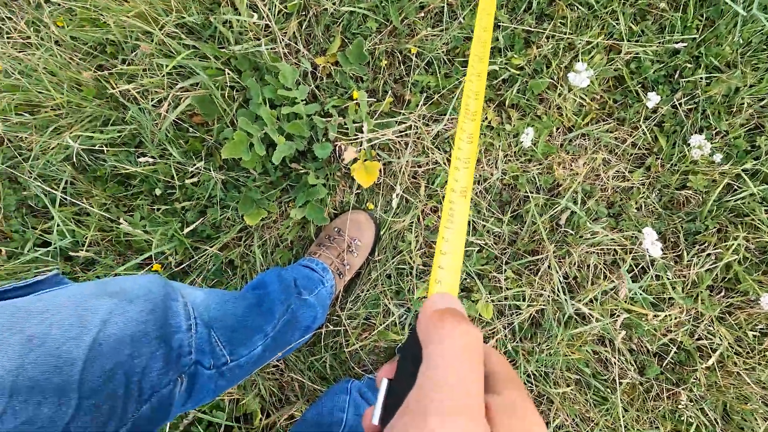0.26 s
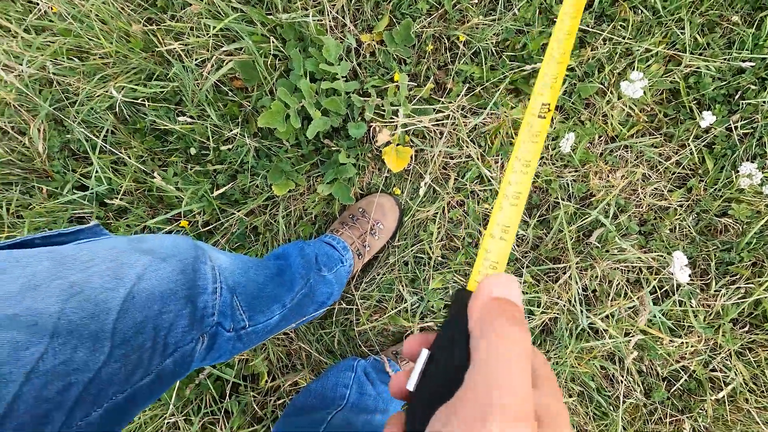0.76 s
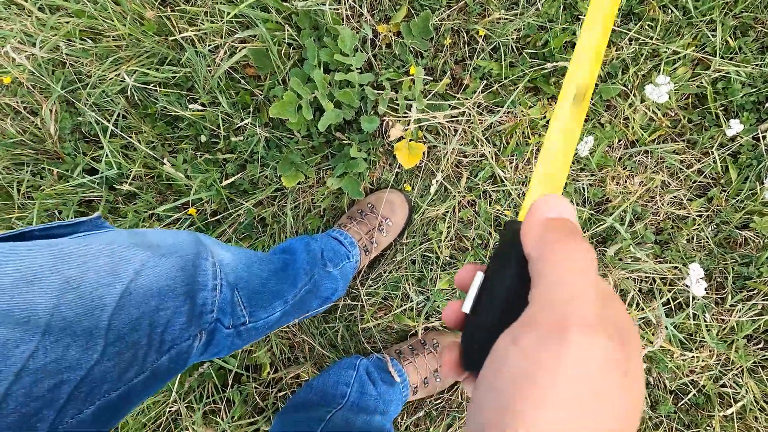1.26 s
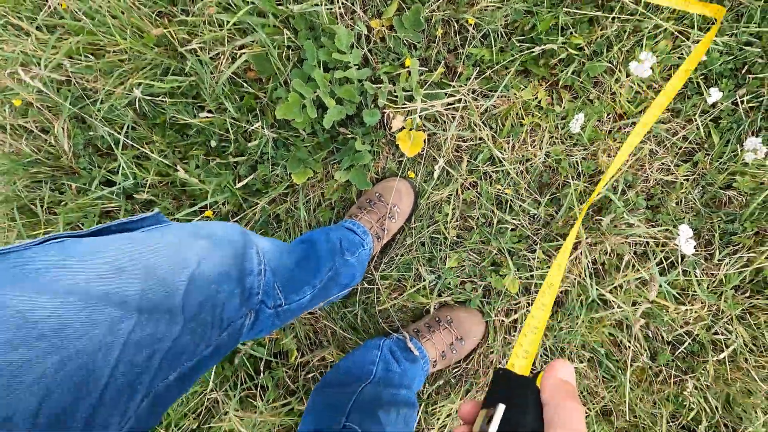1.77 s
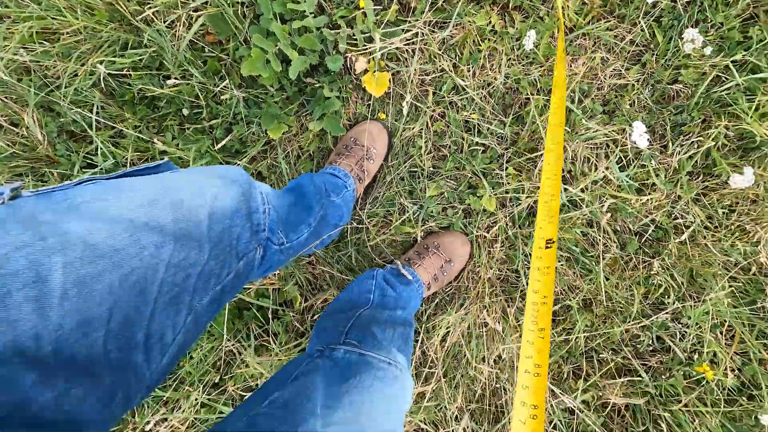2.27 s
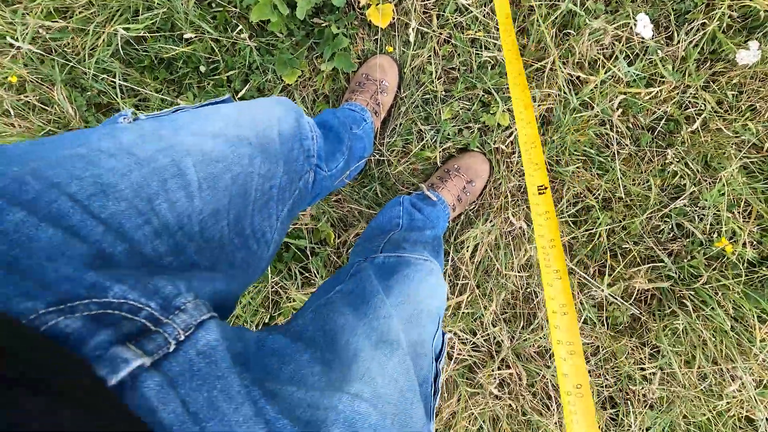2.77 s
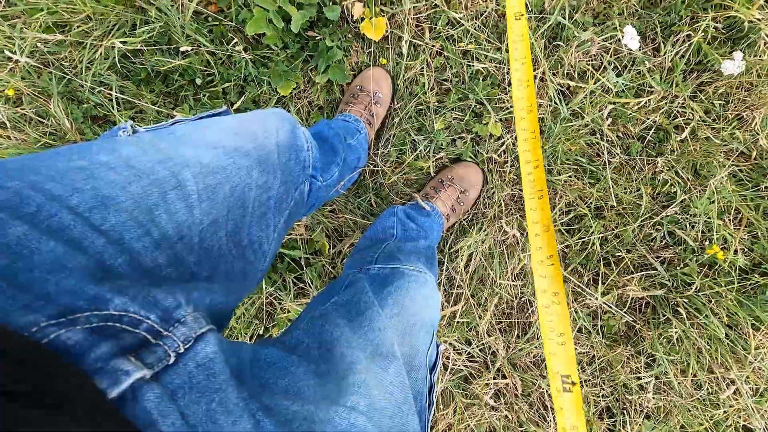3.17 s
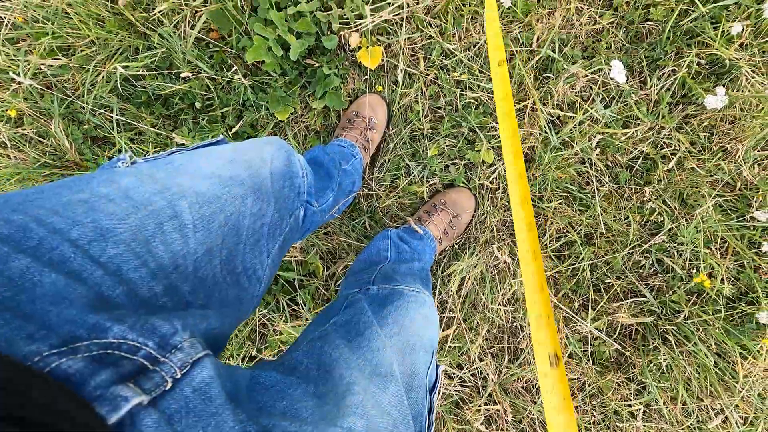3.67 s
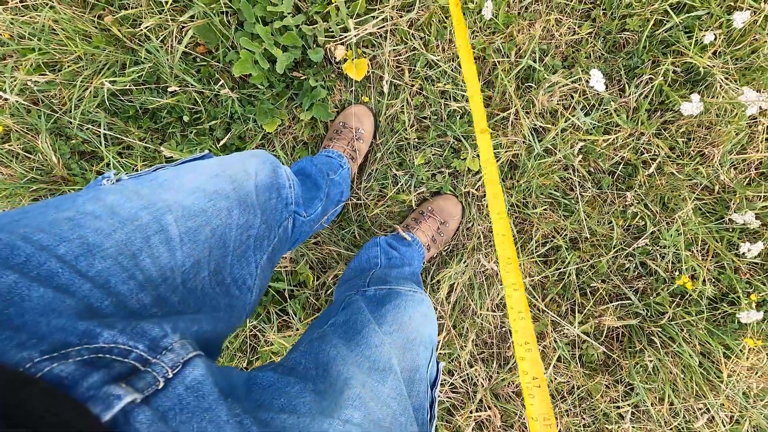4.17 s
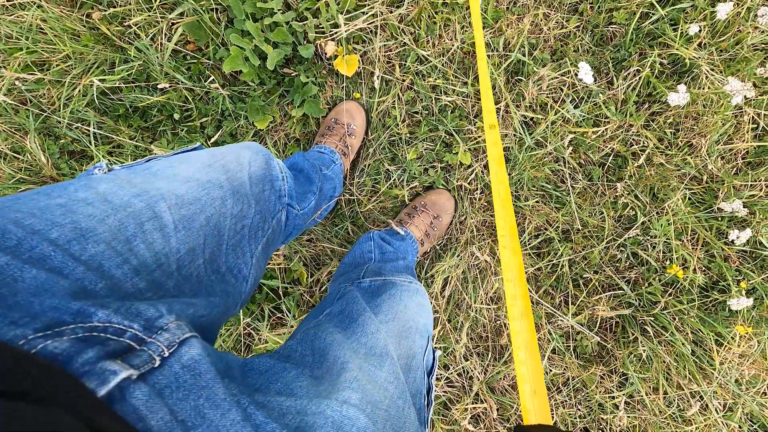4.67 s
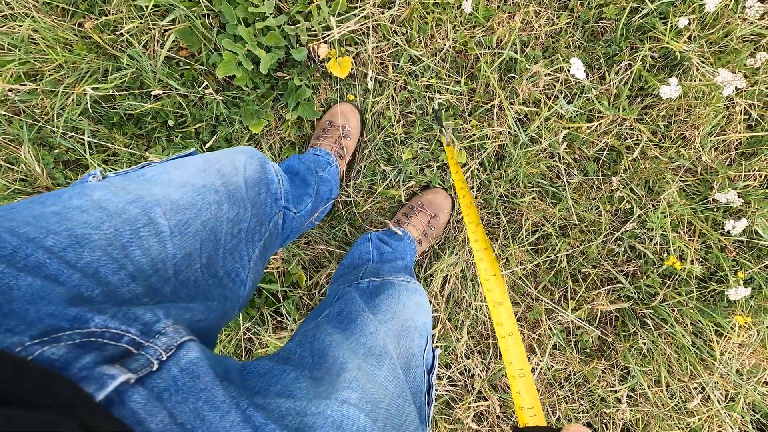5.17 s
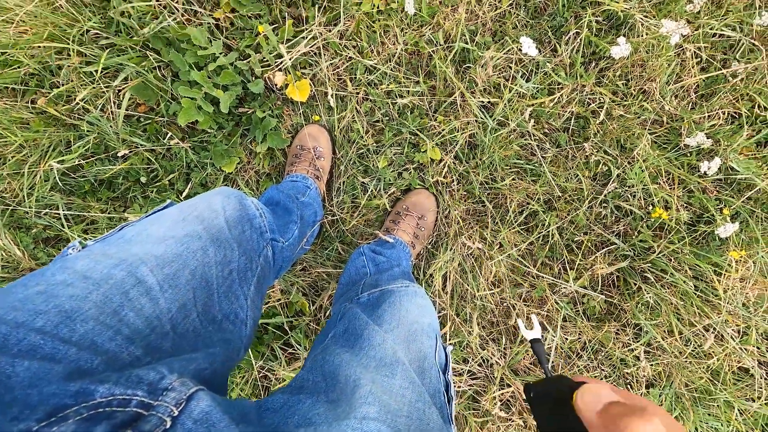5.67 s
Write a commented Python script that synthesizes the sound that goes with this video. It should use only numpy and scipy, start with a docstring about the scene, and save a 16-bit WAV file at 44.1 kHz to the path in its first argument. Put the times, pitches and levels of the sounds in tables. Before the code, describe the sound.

A handheld tape measure retracts in a grassy field, heard close by, nearly mono, with no echo. Its spool whirs roughly in early spurts with dense plastic ticks and hollow bumps, then nearly rests. The thin blade whips, hisses and knocks in uneven pulls, before the metal hook smacks into the case and leaves faint air.

```python
"""Faint open air comes first, then clicks and bumps as a steel tape measure is reeled in by spurts.
The blade scrapes and hisses as filtered noise built from tiny impacts; the reel rumbles and rattles.
Decaying modes make the case click and the spool bump; the bending blade knocks and its steel sizzles.
Near the end the hook slams into the case, which jumps with a short thud. No echo is added."""
import sys
import numpy as np
from scipy import signal
from scipy.fft import rfft, irfft, next_fast_len
from scipy.io import wavfile
from scipy.ndimage import uniform_filter1d, map_coordinates

SR = 44100
rng = np.random.default_rng(int(sys.argv[2]) if len(sys.argv) > 2 else 0)


def file_out(sig):
    """Save sig as 16-bit WAV at sys.argv[1]."""
    # one column per channel
    cols = np.atleast_2d(sig).T
    # limit, then scale
    lim = np.clip(cols, -1, 1)
    pcm = np.round(lim * 32767).astype(np.int16)
    wavfile.write(sys.argv[1], SR, pcm)


N = 261299

# In spectra, levels are relative: each sound is set to its loudness later.
# the open air: (time [s], level [dB])
AIR_LEVEL = [(0, -46.5), (.3, -46.5), (1, -49), (2.05, -55.5), (2.7, -53.5), (5.7, -51.5), (5.93, -56.5)]
# soft rubbing of hand and clothes: (time [s], level [dB])
CLOTH_LEVEL = [(0, -71), (2.1, -78), (2.25, -55.5), (2.5, -50), (2.7, -59), (3.2, -50), (5.6, -54.5),
               (5.93, -58)]
# spectra of the air and the cloth: (frequency [Hz], level [dB])
AIR_SPECTRUM = [(25, 6), (100, -10), (150, -0.5), (190, 2.5), (320, -5), (650, -6.5), (900, -10.5),
                (1400, -3.5), (2200, -13.5), (3500, -18), (5500, -25.5), (8000, -47), (14000, -41)]
CLOTH_SPECTRUM = [(40, -33.5), (130, -16), (220, -5.5), (400, -4), (700, -21), (2000, -23), (6000, -52)]
# the spool bumps hard inside the case: (time [s], level before a common lift [dB], pitch [Hz])
SPOOL_CLUNKS = [(0.358, -34.5, 680), (0.668, -13, 910), (0.741, -11, 1050), (1.249, -13, 657),
                (1.45, -18.5, 890), (3.847, -19.5, 606), (3.892, -18, 610), (4.874, -23, 584)]
# brake, blade and hook tap the case:
# (time [s], level before a common lift [dB], brightest ring [Hz], boost of low case modes [dB])
CASE_TAPS = [(0.3008, -20, 2530, -14), (0.3032, -11.5, 4550, -6), (0.3369, -20.5, 2420, -10),
             (0.5118, -22.5, 2860, -12), (0.611, -13.5, 2780, 3), (0.6228, -10, 2640, 2.5),
             (0.631, -3.5, 2450, -5), (0.6497, -9, 3000, -5), (0.6823, -8.5, 2650, -3),
             (0.7423, -7, 2090, 2.5), (0.951, -34, 4740, -18), (0.9958, -16.5, 3800, -7),
             (1.0005, -16.5, 2410, -1), (1.053, -15, 4180, -11), (1.069, -12.5, 4150, -4),
             (1.1086, -11.5, 2500, -7), (1.1155, -8, 2507, -3.5), (1.1268, -10.5, 3830, -7),
             (1.1913, -8, 2640, 3.5), (1.226, -10, 2270, -1), (1.2486, -8.5, 2910, 1),
             (1.5286, -7, 4140, -2), (1.5533, -9, 3500, 3), (2.428, -26.5, 2022, -14),
             (2.7928, -31.5, 2440, -10), (2.8595, -16, 2520, -13.5), (3.223, -22.5, 2170, -12),
             (3.2792, -15.5, 3800, -8.5), (3.4417, -13.5, 3100, -0.5), (3.4945, -8, 4000, -12),
             (4.0245, -10, 3400, -13), (4.6095, -16, 2180, 0), (4.6732, -18, 2480, -18),
             (4.8166, -10, 2410, -25), (4.8903, -8, 2530, -5), (5.2759, -10.5, 2650, 2),
             (5.387, -16, 2680, -2), (5.4503, -15.5, 3270, -15), (5.6788, -25.5, 3100, -2),
             (5.8608, -32, 2110, -15), (5.89, -34, 2650, -16)]
# random ticks and bumps of the turning spool:
# (rate [per s], level over the scrape before that lift [dB], scatter [dB], pitch [Hz], scatter [octaves])
STRAY_TICKS = (60, 7.5, 2, 2700, 0.4)
STRAY_BUMPS = (34, 1.4, 2.4, 717, 0.22)
# modes of the case with the blade in it: (frequency [Hz], relative level [dB], time to fall 60 dB [s])
CASE_MODES = [(607, -5, 0.021), (884, -4.5, 0.0089), (1660, -1, 0.0027), (2230, -1.5, 0.013),
              (2487, 0.5, 0.0095), (2920, -3, 0.012), (3596, -2.5, 0.011), (4320, -1.5, 0.01),
              (5360, 0, 0.0048), (6780, -1, 0.0069), (6790, -7, 0.0064), (11240, -9, .003)]
# the blade buckles and snaps straight:
# (time [s], level before a common lift [dB], boost of the low thud [dB])
BLADE_KNOCKS = [(2.961, -11.5, 3), (2.972, -11.5, 4.5), (2.986, -15, 13), (3.594, -11.5, -1.5),
                (3.603, -17.5, 9), (3.873, -6, 7.5), (4.19, -8.5, 8.5), (4.441, -18, 2.5),
                (4.997, -9.5, 3.5), (5.276, -16, 7)]
# spectrum of a knock: (frequency [Hz], level [dB])
KNOCK_SPECTRUM = [(40, -20), (110, -16.5), (190, -1), (330, 4.5), (650, 1), (1200, -4.5), (2300, 7.5),
                  (3300, 4.5), (4500, -6.5), (8000, -14), (14000, -31)]
# the hook strikes home and rebounds: (time [s], level [dB], brightness [0-1])
HOOK_BLOWS = [(5.6152, 15.5, 1), (5.6163, 5, 0.4), (5.6174, 3, 0.07)]
# the case jumps in the hand: (frequency [Hz], level before a low cut [dB], time to fall 60 dB [s])
CASE_JOLT = [(136, -23.5, 0.036), (417, -28.5, 0.043), (720, -10, 0.024), (880, -7, 0.012)]
# the loose blade whips and sizzles: (time [s], level before flutter [dB], time to fall 60 dB [s])
BLADE_WHIPS = [(0.303, -38.5, 0.18), (1.248, -26, 0.082), (2.740, -38.5, 0.19), (2.861, -40, 0.13),
               (2.959, -18, 0.33), (2.990, -11.5, 0.13), (3.512, -19, 0.32), (3.591, -22, 0.23),
               (3.641, -13.5, 0.23), (3.893, -14.5, 0.31), (3.929, -16.5, 0.18), (4.15, -16, 0.089),
               (4.192, -14.5, 0.26), (4.21, -12, 0.26), (4.826, -17.5, 0.18), (4.9392, -9.5, 0.06),
               (5.045, -15, 0.072), (5.275, -19.5, 0.088)]
# spectra of the whipping steel, scrape, hiss, reel rumble and coil rattle: (frequency [Hz], level [dB])
STEEL_SPECTRUM = [(50, -44), (400, -10), (1200, -21), (2300, -6), (3600, -3.5), (4800, 1), (6000, 0.5),
                  (7200, -3), (8200, -12.5), (9500, -15), (11200, -10), (12600, -18.5), (13600, -32.5),
                  (14400, -55)]
SCRAPE_SPECTRUM = [(300, -31), (900, -20), (1300, -12.5), (1700, -4.5), (2250, 1), (3000, 0.5),
                   (4000, -1.5), (5500, -18), (7500, -53), (11000, -40), (14000, -48)]
HISS_SPECTRUM = [(1000, -26.5), (2500, -17), (3600, -3), (4600, 4.5), (5800, -1), (7200, -3.5), (8000, -12),
                 (9500, -17), (11200, -14.5), (12600, -20), (13400, -33.5), (14300, -73)]
REEL_SPECTRUM = [(25, -20.5), (90, -21.5), (180, -6.5), (330, -5), (450, -7), (600, 3), (780, -5.5),
                 (1100, -10.5), (1600, -4.5), (3000, -61.5)]
RATTLE_SPECTRUM = [(60, -29), (200, -22.5), (420, -7), (640, -2), (950, -4), (1300, -6), (1750, -2),
                   (2300, 1.5), (3000, -1), (3600, -12), (5500, 1.5), (8000, -31.5), (14000, -55)]
# the spool spins up, runs and is braked; rise and fall are the times for 20 dB:
# (full speed at [s], held [s], scrape [dB], rise [s], fall [s], hiss over scrape [dB])
SPOOL_RUNS = [(0.625, 0.13, -26, 0.069, 0.17, -6), (1.125, 0.053, -27.5, 0.04, 0.16, -6),
              (1.253, 0.295, -23, 0.008, 0.044, -1.5), (5.6, 0.0093, -28, 0.064, 0.03, -6)]
# the free blade swishes as it is drawn along; rise and fall as above:
# (peak at [s], scrape [dB], rise [s], fall [s], hiss over scrape [dB], case rumble over scrape [dB])
BLADE_SWISHES = [(0.085, -64, 0.1, 0.2, 3, -4), (0.57, -32, 0.07, 0.2, -3, -16),
                 (0.715, -22, 0.11, 0.13, -3, -13), (0.83, -46.5, 0.1, 0.16, -14, -1),
                 (1.075, -33.5, 0.086, 0.2, 0, -11), (1.38, -31, 0.14, 0.18, 16, -7.5),
                 (1.531, -30, 0.51, 0.15, 13.5, -1.5), (1.695, -26, 0.083, 0.17, -1, -18),
                 (1.84, -44.5, 0.06, 0.091, 13, -14.5), (1.935, -34.5, 0.07, 0.15, 1, -11.5),
                 (2.23, -46, 0.14, 0.16, 6.5, -9.5), (2.38, -40, 0.1, 0.24, 1.5, -11.5),
                 (2.66, -52, 0.12, 0.1, 7, -10), (2.931, -29, 0.093, 0.28, 1, -9),
                 (3.019, -24, 0.12, 0.094, 2, -14.5), (3.13, -41.5, 0.029, 0.067, 4, -4.5),
                 (3.29, -30.5, 0.075, 0.11, 2, -10), (3.475, -36.5, 0.1, 0.41, 6, -8),
                 (3.61, -24, 0.091, 0.31, -1, -11), (3.78, -30.5, 0.6, 0.2, 3.5, -25),
                 (3.86, -25.5, 0.058, 0.18, 2.5, -10), (3.98, -24.5, 0.23, 0.27, -4.5, -21.5),
                 (4.159, -25, 0.12, 0.11, 1, -11), (4.3, -28, 0.32, 0.068, 0, -14.5),
                 (4.37, -45, 0.14, 0.16, -22, -4.5), (4.46, -22, 0.023, 0.1, 0.5, -11.5),
                 (4.68, -39, 0.11, 0.13, -11, -7), (4.778, -27.5, 0.16, 0.28, -0.5, -13),
                 (5.019, -31, 0.088, 0.12, 2, -8), (5.11, -28, 0.2, 0.15, -10.5, -10),
                 (5.26, -36, 0.14, 0.12, -7, -8.5), (5.505, -35, 0.073, 0.12, -1.5, -11),
                 (5.655, -44, 0.08, 0.034, -13, -7)]
# overall colour, a narrow notch near 9 kHz and little above 14 kHz: (frequency [Hz], gain [dB])
OVERALL_COLOUR = [(20, -29), (60, -2.5), (8300, 0), (8850, -7.5), (9050, -19.5), (9250, -3.5), (9700, 0.5),
                  (13400, 1.5), (14800, -19.5), (16000, -28)]
# difference between the two channels: (frequency [Hz], side over middle [dB])
STEREO_WIDTH = [(30, -36), (200, -19), (2500, -57.5), (10500, -23.5), (11400, -5.5), (14000, 2.5)]

TOP_HZ = 16400
RUN_REEL_DB = -6  # rumble of a run, over its scrape
FOCUS_DB_PER_OCTAVE = 5.5  # a tap rings the modes less the further they lie from its own pitch
STRAY_HOLLOW_DB = 0.5  # boost of the low case modes under a stray tick


def amp(db):
    """Turn decibels into gain."""
    return 10 ** (np.asarray(db) / 20)


def unit(x):
    """Scale to an rms of 1."""
    return x / np.sqrt(np.mean(x ** 2) + 1e-20)


def unit_energy(x):
    """Scale so that the squares of all samples add up to 1."""
    return x / np.linalg.norm(x)


def along(points, hz):
    """Read a (frequency, value) table at any frequency, on a log axis."""
    f, v = np.transpose(points)
    return np.interp(np.log(hz + 1), np.log(f + 1), v)


def level_curve(rows):
    """Read a (time, level) table at every sample."""
    times, levels = np.transpose(rows)
    return np.interp(np.arange(N) / SR, times, levels)


def wobble(rate):
    """Draw a smooth random curve with rate knots a second."""
    knots = rng.standard_normal(int(N * rate / SR) + 4)
    return map_coordinates(knots, [np.arange(N) * rate / SR])


def filtered(x, response):
    """Multiply the spectrum of x by a gain that depends on frequency."""
    m = next_fast_len(N + SR // 4)
    gain = response(np.fft.rfftfreq(m, 1 / SR))
    return irfft(rfft(x, m) * gain, m)[..., :N]


def causal(spectrum, ripple_db=0, size=2048):
    """Make a minimum-phase filter from a spectrum, with a random ripple like dense resonances."""
    hz = np.fft.rfftfreq(size, 1 / SR)
    ripple = unit(uniform_filter1d(rng.standard_normal(len(hz)), size=4))
    cepstrum = irfft(np.log(amp(along(spectrum, hz) + ripple_db * ripple)))
    # folding the cepstrum forward in time gives minimum phase
    cepstrum[1:size // 2] *= 2
    cepstrum[size // 2 + 1:] = 0
    return irfft(np.exp(rfft(cepstrum)))


def through(x, response):
    """Pass x through a filter, keeping its length."""
    return signal.fftconvolve(x, response)[:len(x)]


def add(track, s, sound):
    """Mix a sound into a track at time s."""
    part = track[round(s * SR):][:len(sound)]
    part += sound[:len(part)]


def contacts(rate, spread_db, smooth):
    """Friction: rate tiny random impacts a second, plus a share of smooth noise."""
    happens = rng.random(N) < rate / SR
    strength = amp(spread_db * np.clip(rng.standard_normal(N), -2, 2))
    hits = happens * strength * rng.choice([-1, 1], N)
    return unit(unit(hits) + smooth * rng.standard_normal(N))


def flexing(x, depth_db):
    """Resonances drift as the blade bends: gain patches about 500 Hz wide and 40 ms long."""
    z = signal.stft(x, nperseg=512)[2]
    field = uniform_filter1d(rng.standard_normal(z.shape), size=6, axis=0)
    field = uniform_filter1d(field, size=7, axis=1)
    gain = amp(depth_db * np.clip(unit(field), -2, 2))
    return unit(signal.istft(z * gain, nperseg=512)[1][:N])


def shimmer(x, t60, db):
    """After a blow the thin steel rings on briefly, like fading noise, in countless modes."""
    t = np.arange(SR // 4) / SR
    tail = rng.standard_normal(len(t)) * amp(-60 * t / t60)
    tail = through(tail, causal([(300, -14), (1200, 13.5), (2200, 6.5), (12000, -3.5)]))
    return x + amp(db) * through(x, unit_energy(tail))


def chatter(length, bounce, count=5, size=4096):
    """A first contact is followed by a few weaker bounces within length seconds."""
    when, strength = rng.random((2, count))
    blows = np.zeros(size)
    blows[0] = 1
    blows[np.clip(when * length * SR, 1, size - 1).astype(int)] = bounce * (2 * strength - 1)
    return blows


def case_ring(gain_db, detune, scatter_db, crack_db, size=4096):
    """One blow on the case: a dry crack, and modes of new strengths, a little detuned by the grip."""
    hz, db, t60 = np.transpose(CASE_MODES)[:, :, None]
    t = np.arange(size) / SR
    level, shift = rng.standard_normal((2, len(CASE_MODES), 1))
    sign = (-1) ** np.arange(len(CASE_MODES))[:, None]
    strength = sign * amp(db + gain_db(hz) + scatter_db * level - 60 * t / t60)
    modes = strength * np.sin(2 * np.pi * hz * (1 + detune * shift) * t)
    crack = through(rng.standard_normal(size) * amp(-60 * t / 0.0039), causal(SCRAPE_SPECTRUM))
    ring = unit(modes.sum(0)) + amp(crack_db) * unit(crack)
    return signal.lfilter(*signal.butter(1, 320, "high", fs=SR), ring)  # a small case radiates little bass


def swell(s, hold, rise, fall):
    """Power climbs to 1 at time s, holds and dies away; rise and fall seconds each span 20 dB."""
    t = np.arange(N) / SR
    before = np.maximum((s - t) / rise, 0)
    after = np.maximum((t - s - hold) / fall, 0)
    return amp(-20 * np.minimum(before + after, 10)) ** 2


def spool_power():
    """The scrape of the turning spool swells and fades in power with each run."""
    return sum(amp(db) ** 2 * swell(s, hold, rise, fall) for s, hold, db, rise, fall, _ in SPOOL_RUNS)


def strays(spool, rule, count=500):
    """Random (time, level, pitch) contacts while the spool turns, as strong as it runs."""
    rate, over_db, scatter_db, hz, octaves = rule
    when, strength, pitch = np.clip(rng.standard_normal((count, 3)), -2, 2).T
    times = (np.arange(count) + when / 2) / rate
    level = np.interp(times, np.arange(N) / SR, 10 * np.log10(spool))
    rows = np.transpose([times, level + over_db + scatter_db * strength, hz * 2 ** (octaves * pitch)])
    return rows[level > -38]  # a slow spool throws off none


def outdoors():
    """Faint open air, and hand and clothes shifting: two filtered noises of wavering level."""
    air = unit(through(rng.standard_normal(N), causal(AIR_SPECTRUM)))
    cloth = unit(through(rng.standard_normal(N), causal(CLOTH_SPECTRUM)))
    air_db = level_curve(AIR_LEVEL) + 3.0 * wobble(rate=7.02)
    cloth_db = level_curve(CLOTH_LEVEL) + 0.82 * wobble(rate=9.6)
    return air * amp(air_db) + cloth * amp(cloth_db)


def clunks(spool, t60=0.031):
    """Soft, hollow bumps: two close modes of the spool, with no sharp edge."""
    track = np.zeros(N)
    t = np.arange(SR // 16) / SR
    soft_start = 1 - np.exp(-t / 0.0013)
    for s, db, hz in [*SPOOL_CLUNKS, *strays(spool, STRAY_BUMPS)]:
        modes = np.sin(2 * np.pi * hz * t) - 0.4 * np.sin(2 * np.pi * 1.35 * hz * t)
        add(track, s, amp(db + 2.0 - 60 * t / t60) * soft_start * modes)
    return track


def taps(spool):
    """Short plastic clicks, each favouring the case modes near its own pitch."""
    track = np.zeros(N)
    ticks = [(*tick, STRAY_HOLLOW_DB) for tick in strays(spool, STRAY_TICKS)]
    for s, db, ring_hz, body_db in [*CASE_TAPS, *ticks]:
        def colour(hz):
            """Mode gain in dB: a set boost at the bottom, a focus on the tap's pitch above."""
            return np.where(hz < 1200, body_db, -FOCUS_DB_PER_OCTAVE * np.abs(np.log2(hz / ring_hz)))

        ring = case_ring(colour, detune=0.035, scatter_db=3.0, crack_db=-2.5)
        click = through(chatter(length=0.004, bounce=0.66), ring)
        add(track, s, amp(db + 16.0) * unit_energy(click))
    return shimmer(track, t60=0.11, db=-11.0)


def knocks(size=4096):
    """A kink runs down the blade as a bending wave: treble arrives first, the thud a few ms later."""
    track = np.zeros(N)
    hz = np.fft.rfftfreq(size, 1 / SR)
    for s, db, thud_db in BLADE_KNOCKS:
        travel = 0.002153 * np.exp(0.139 * rng.standard_normal())  # seconds at 1 kHz
        phase = 4 * np.pi * travel * np.sqrt(hz * 1000)
        level_db = along(KNOCK_SPECTRUM, hz) + thud_db / (1 + (hz / 900) ** 2)
        wave = irfft(amp(level_db) * np.exp(-1j * phase))[:size // 2]
        wave = through(wave, chatter(length=0.005, bounce=0.38))
        add(track, s, amp(db + 20.0) * unit_energy(wave))
    return shimmer(track, t60=0.032, db=-11.0)


def mouth(bright):
    """Around the mouth of the case, a duller contact rings only the modes near the mouth's pitch."""
    focus = 11 - 7 * np.clip(bright, 0, 1)  # dB per octave
    return lambda hz: -focus * np.abs(np.log2(hz / 2450)) - 6 * (hz < 1200)


def hook():
    """The hook scrapes into the mouth and slams into the case, which jumps with a short thud."""
    track = np.zeros(N)
    home = HOOK_BLOWS[0][0]
    for s, db, bright in HOOK_BLOWS:
        blow = case_ring(mouth(bright), detune=0.008, scatter_db=1, crack_db=-8)
        add(track, s, amp(db) * unit_energy(blow))
    # the rivets rub through the slot for about the last hundredth of a second
    slot = case_ring(mouth(0), detune=0.02, scatter_db=1, crack_db=-12)
    rub = signal.fftconvolve(rng.standard_normal(SR // 110), slot)
    add(track, home - 0.0103, amp(7.5) * unit_energy(rub))
    t = np.arange(SR // 16) / SR
    jolt = sum(amp(db - 60 * t / t60) * np.sin(2 * np.pi * hz * t) for hz, db, t60 in CASE_JOLT)
    jolt = signal.lfilter(*signal.butter(3, 150, "high", fs=SR), jolt)
    add(track, home + 0.00053, jolt)
    return shimmer(track, t60=0.1, db=-31)


def whips():
    """A whip sets countless steel modes sizzling, like noise; they die away as the blade settles."""
    track = np.zeros(N)
    t = np.arange(SR // 3) / SR
    onset = 1 - np.exp(-t / 0.00097)
    for s, db, t60 in BLADE_WHIPS:
        add(track, s, amp(db - 60 * t / t60) * onset * rng.standard_normal(len(t)))
    steel = causal(STEEL_SPECTRUM, ripple_db=2.5)
    return through(track * amp(1.7 * np.tanh(wobble(rate=76))), unit_energy(steel))


def slide_levels(spool):
    """Scrape, hiss and reel levels in dB: the powers of spool runs and swishes add up."""
    scrape, hiss, reel = spool.copy(), np.zeros(N), spool * amp(RUN_REEL_DB) ** 2
    for s, hold, db, rise, fall, hiss_db in SPOOL_RUNS:
        hiss += amp(db + hiss_db) ** 2 * swell(s, hold, rise, fall)
    for s, db, rise, fall, hiss_db, reel_db in BLADE_SWISHES:
        power = amp(db) ** 2 * swell(s, 0, rise, fall)
        scrape += power
        hiss += power * amp(hiss_db) ** 2
        reel += power * amp(reel_db) ** 2
    return 10 * np.log10([scrape, hiss, reel])


def blade(spool):
    """The sliding blade: gritty scrape, finer hiss, and the reel rumbling and rattling in its case."""
    scrape_db, hiss_db, reel_db = slide_levels(spool)
    flutter = np.tanh(wobble(rate=110))  # the flapping blade presses unevenly on the slot

    grit = contacts(rate=900, spread_db=2.5, smooth=0.9)
    scrape = flexing(through(grit, causal(SCRAPE_SPECTRUM, ripple_db=1.0)), depth_db=2.5)
    fine_grit = contacts(rate=6000, spread_db=3.5, smooth=1.4)
    hiss = flexing(through(fine_grit, causal(HISS_SPECTRUM, ripple_db=0.3)), depth_db=3.5)
    sizzle = unit(through(rng.standard_normal(N), causal(STEEL_SPECTRUM, ripple_db=5.0)))
    rumble_hits = contacts(rate=450, spread_db=1.5, smooth=0.44)
    reel = unit(through(rumble_hits, causal(REEL_SPECTRUM, ripple_db=1.0)))
    rattle_hits = contacts(rate=140, spread_db=2, smooth=0.05)
    rattle = unit(through(rattle_hits, causal(RATTLE_SPECTRUM, ripple_db=2.5)))

    return (scrape * amp(scrape_db + 2.1 * flutter)
            + hiss * amp(hiss_db + 3.25 * flutter + 0.93 * np.tanh(wobble(rate=49)))
            + sizzle * amp(1.625 * hiss_db + 6.5 + 2.3 * flutter)  # grows faster than the hiss
            + reel * amp(reel_db - 1.0 + 1.9 * np.tanh(wobble(rate=60)))
            + rattle * amp(reel_db + 2.0 + 2.4 * flutter))


def scene():
    """All sounds sit in the centre; a phase-scrambled copy, strongest in the top treble, adds width."""
    spool = spool_power()
    mid = outdoors() + clunks(spool) + taps(spool) + knocks() + hook() + whips() + blade(spool)
    z = signal.stft(mid, nperseg=256)[2]
    scrambled = z * np.exp(2j * np.pi * rng.random(z.shape))
    side = signal.istft(scrambled, nperseg=256)[1][:N]
    side = filtered(side, lambda hz: amp(along(STEREO_WIDTH, hz)))
    return np.array([mid + side, mid - side])


def record(dry):
    """Soft clipping at full scale, then the overall colour and a sharp cut of the top."""
    x = dry / (1 + np.abs(dry) ** 6) ** (1 / 6)
    x = filtered(x, lambda hz: amp(along(OVERALL_COLOUR, hz)))
    return filtered(x, lambda hz: hz < TOP_HZ)


dry = scene()
out = record(dry)
file_out(out)
```